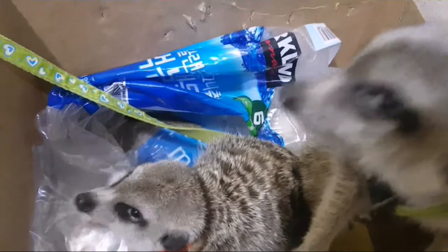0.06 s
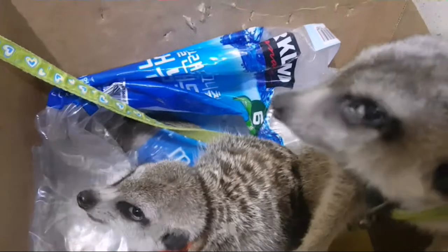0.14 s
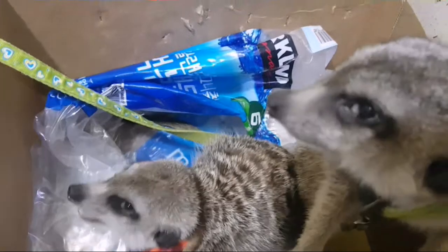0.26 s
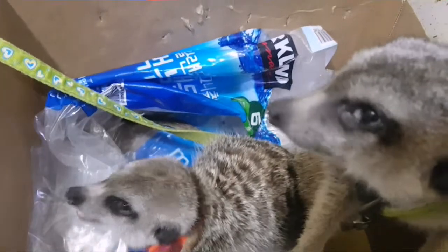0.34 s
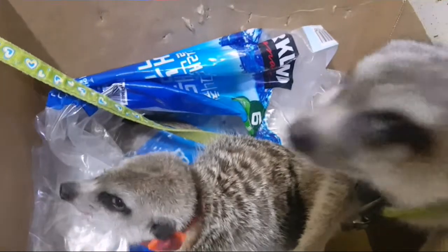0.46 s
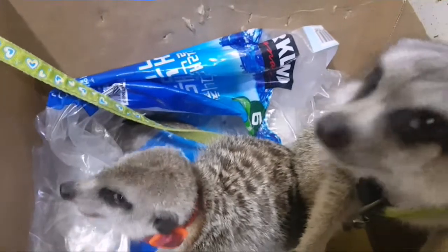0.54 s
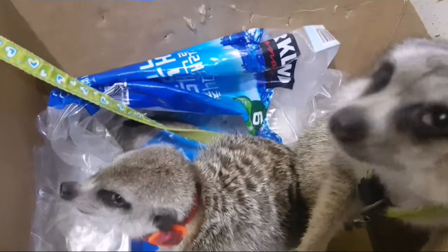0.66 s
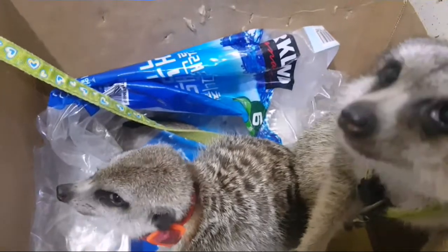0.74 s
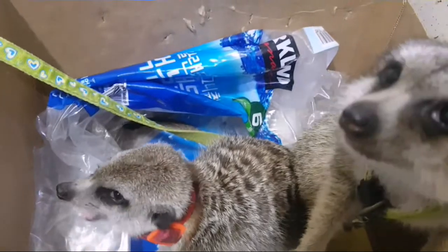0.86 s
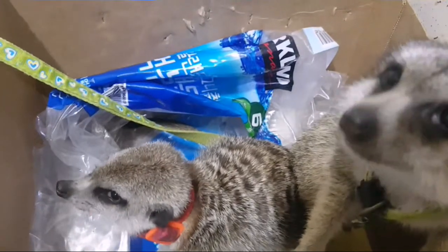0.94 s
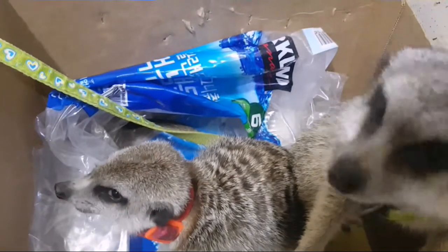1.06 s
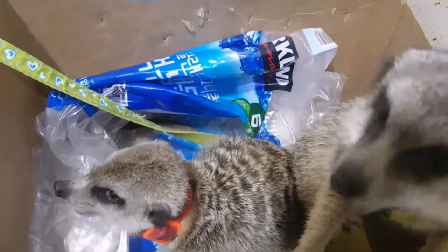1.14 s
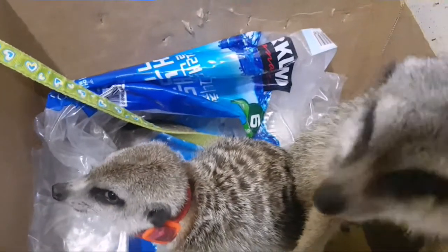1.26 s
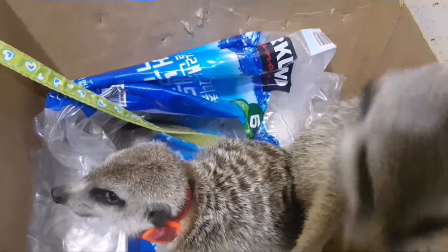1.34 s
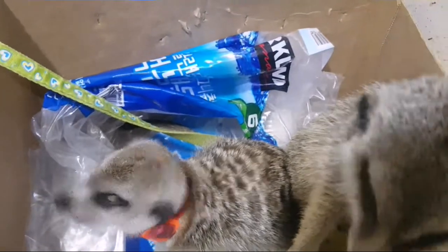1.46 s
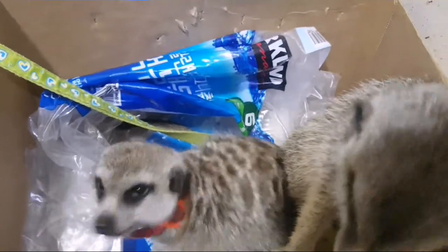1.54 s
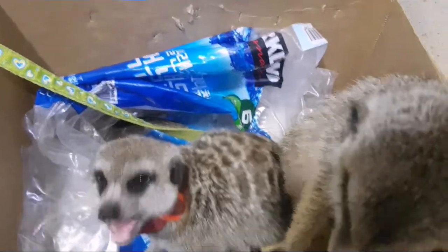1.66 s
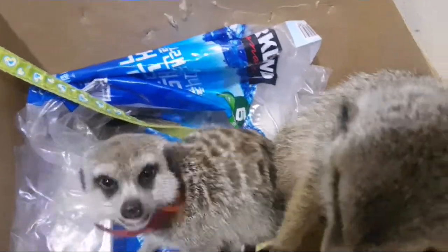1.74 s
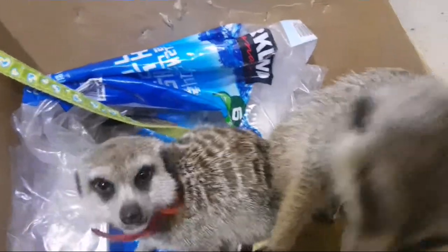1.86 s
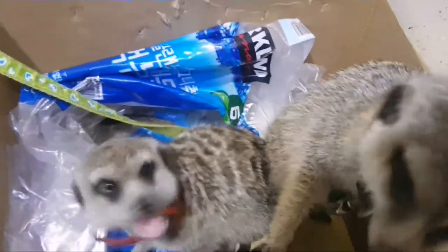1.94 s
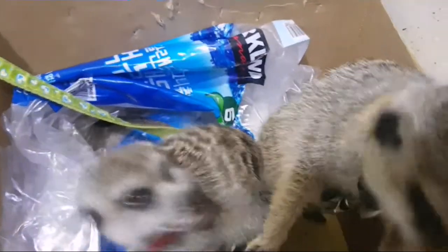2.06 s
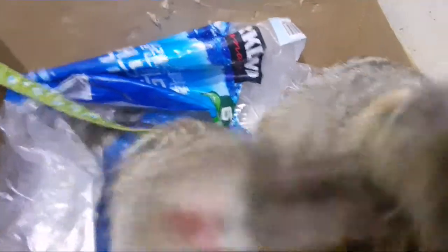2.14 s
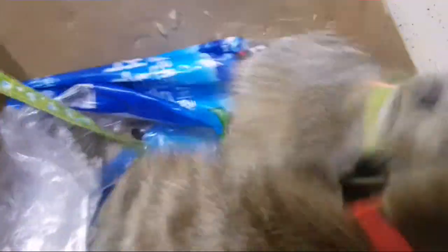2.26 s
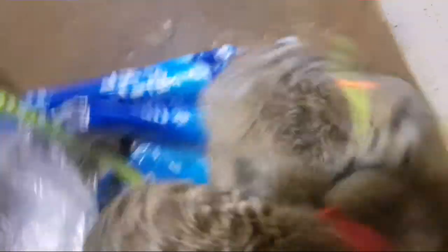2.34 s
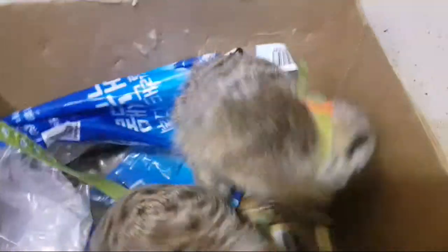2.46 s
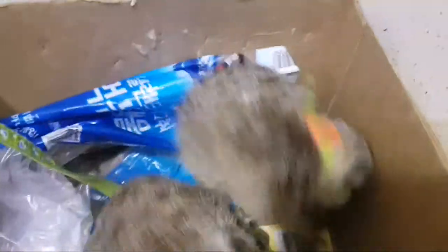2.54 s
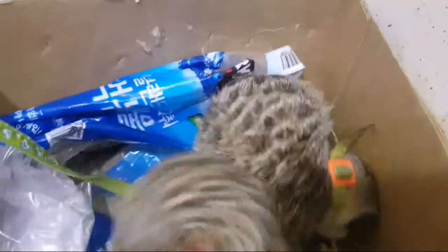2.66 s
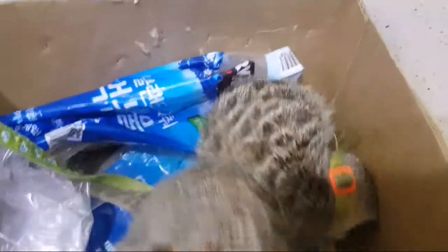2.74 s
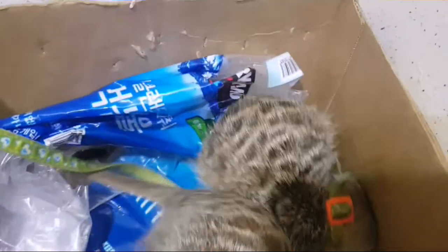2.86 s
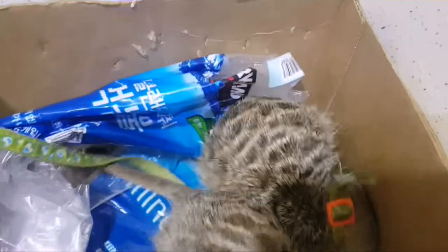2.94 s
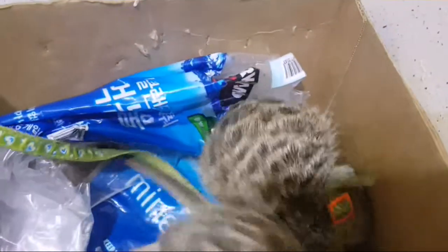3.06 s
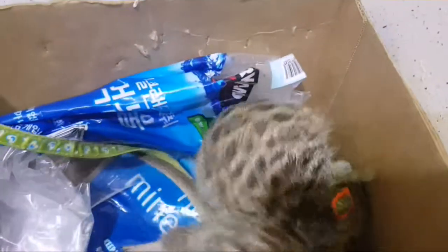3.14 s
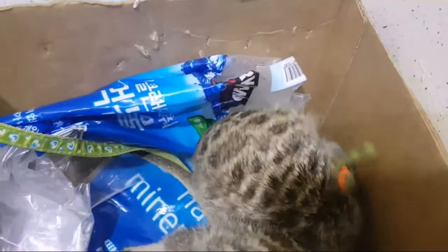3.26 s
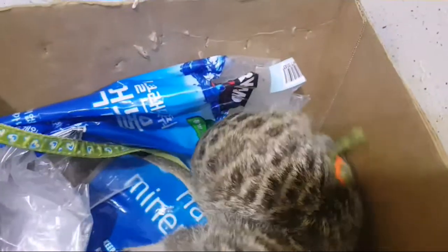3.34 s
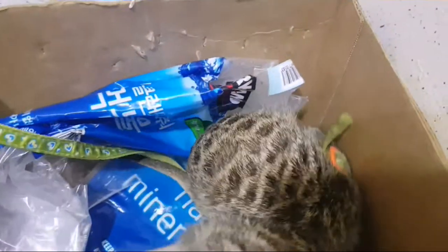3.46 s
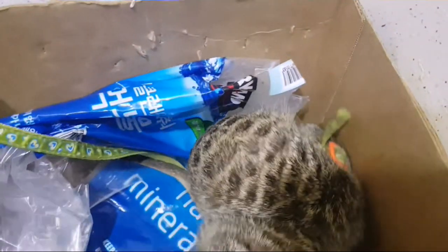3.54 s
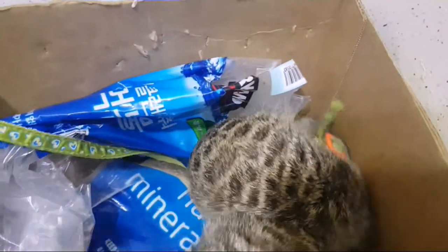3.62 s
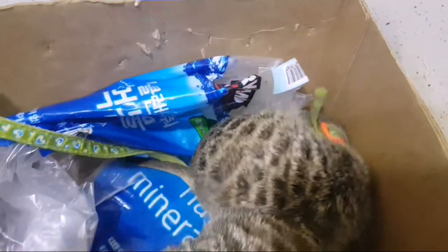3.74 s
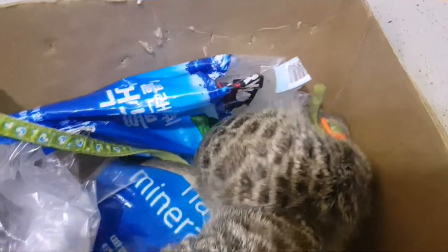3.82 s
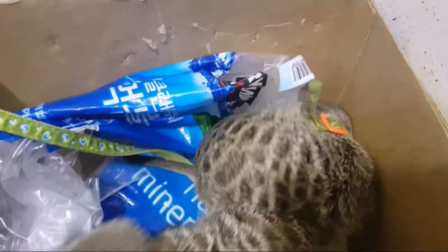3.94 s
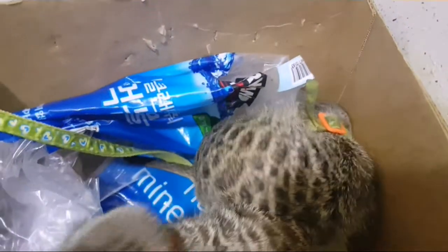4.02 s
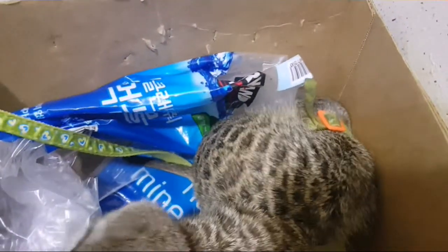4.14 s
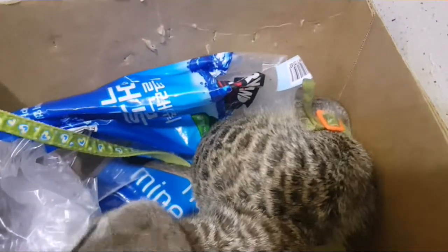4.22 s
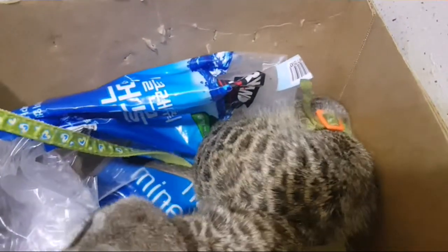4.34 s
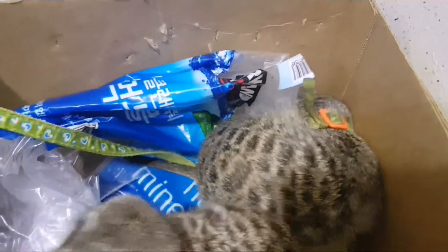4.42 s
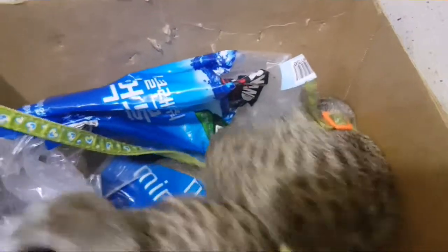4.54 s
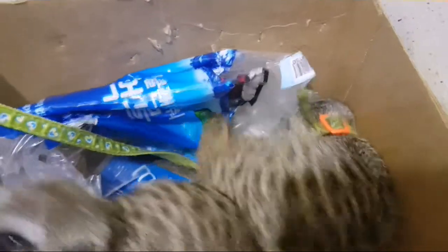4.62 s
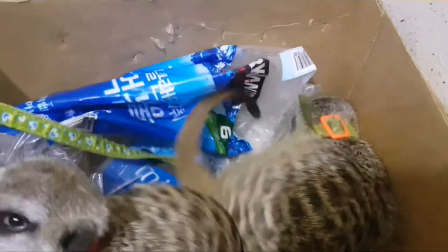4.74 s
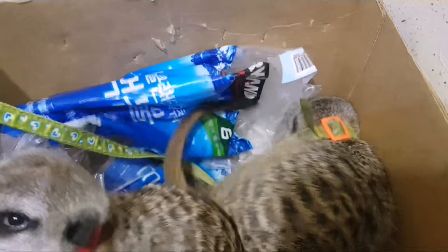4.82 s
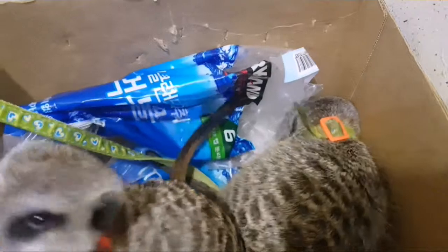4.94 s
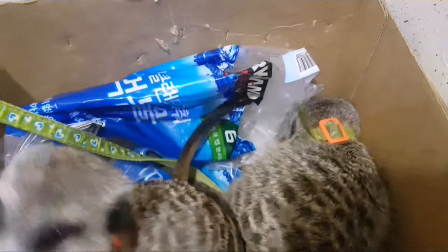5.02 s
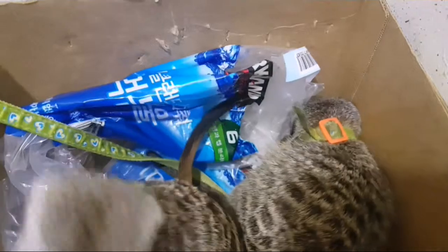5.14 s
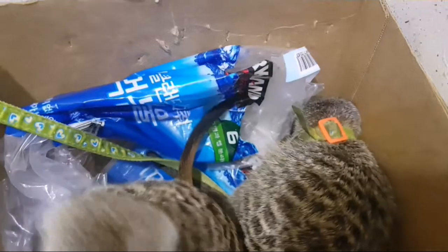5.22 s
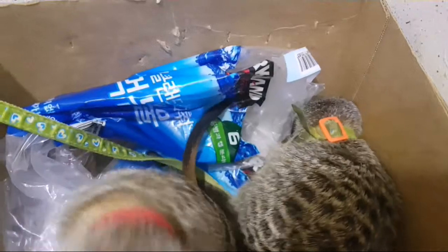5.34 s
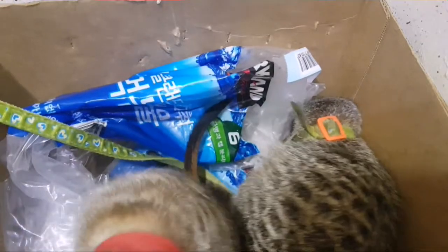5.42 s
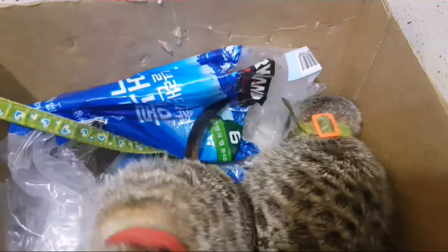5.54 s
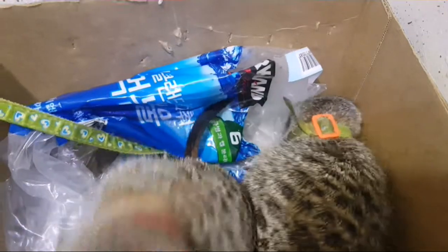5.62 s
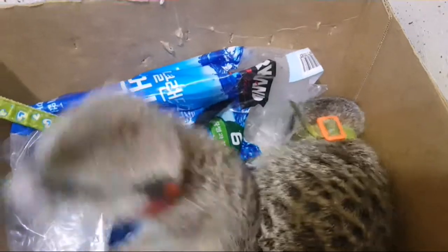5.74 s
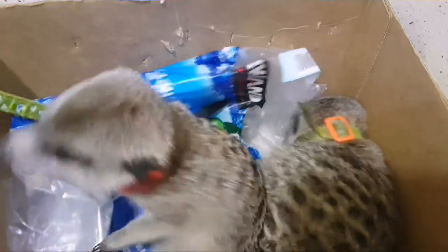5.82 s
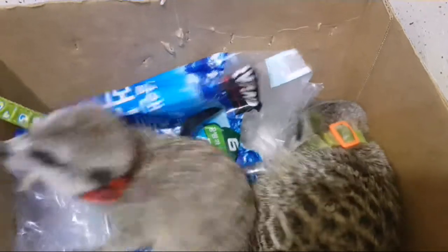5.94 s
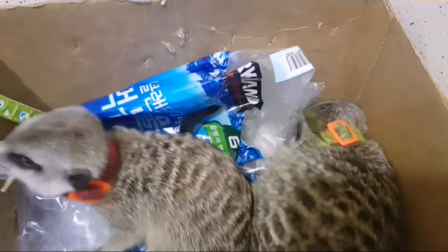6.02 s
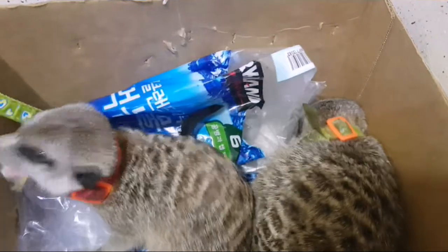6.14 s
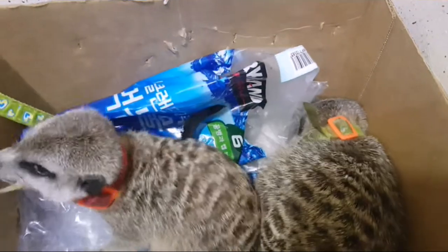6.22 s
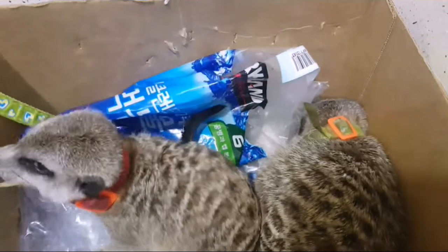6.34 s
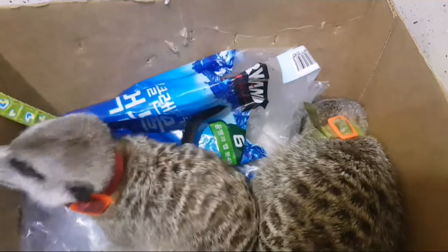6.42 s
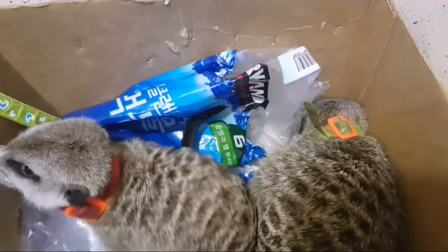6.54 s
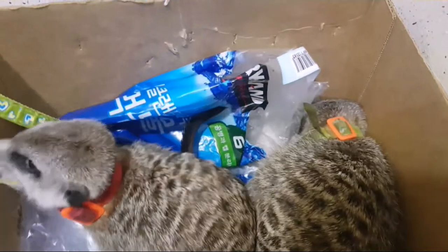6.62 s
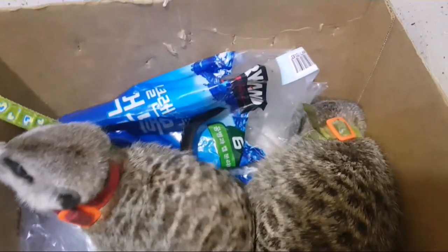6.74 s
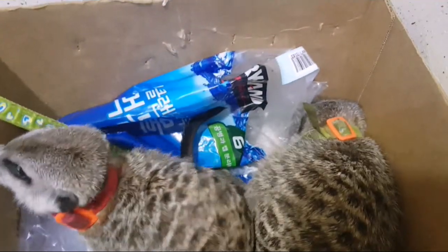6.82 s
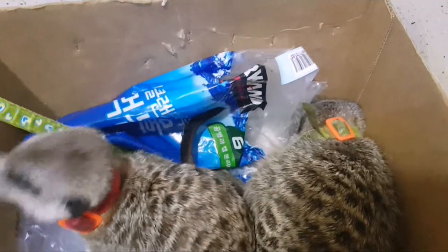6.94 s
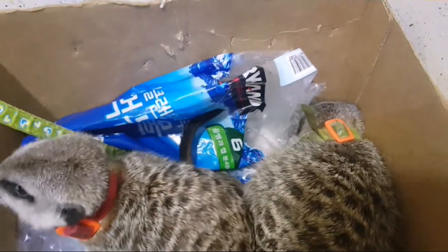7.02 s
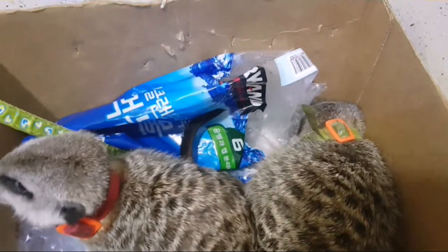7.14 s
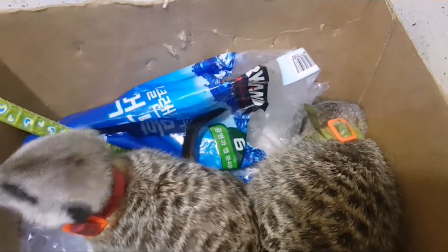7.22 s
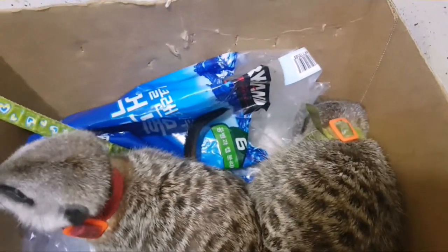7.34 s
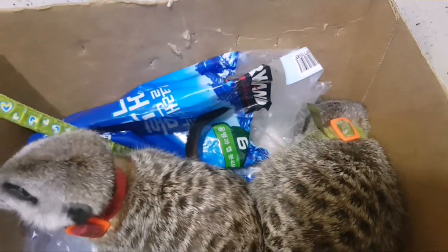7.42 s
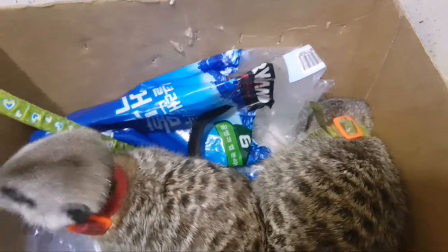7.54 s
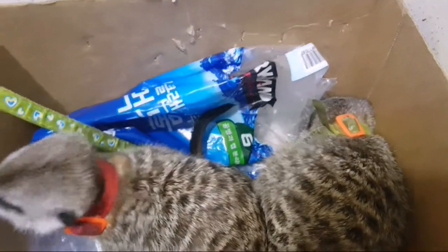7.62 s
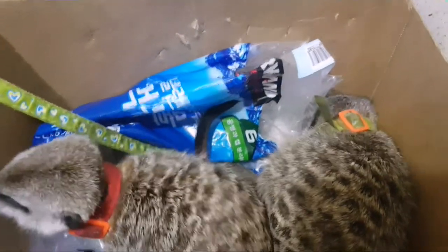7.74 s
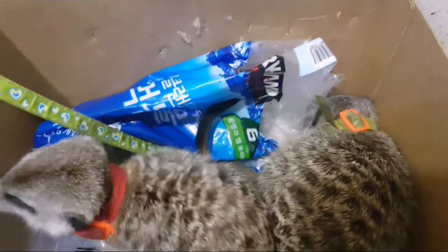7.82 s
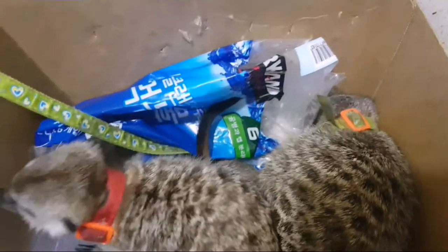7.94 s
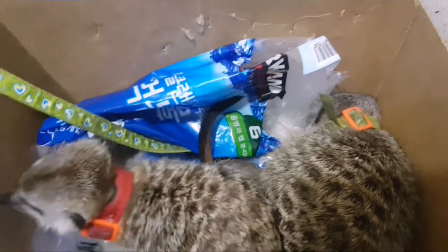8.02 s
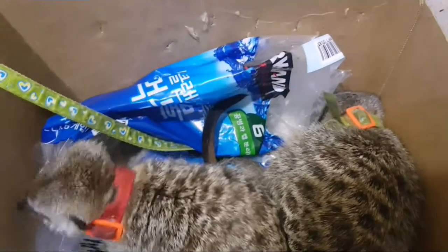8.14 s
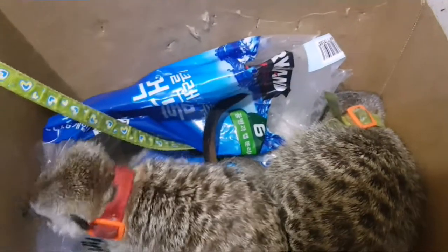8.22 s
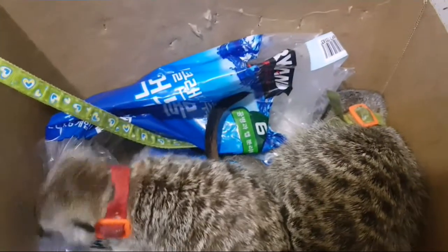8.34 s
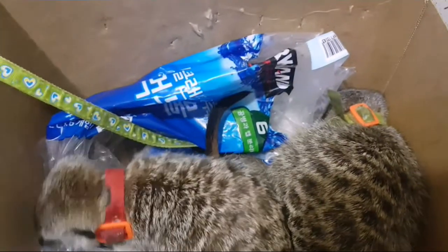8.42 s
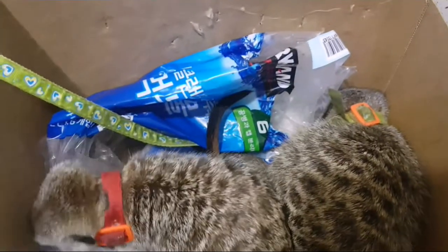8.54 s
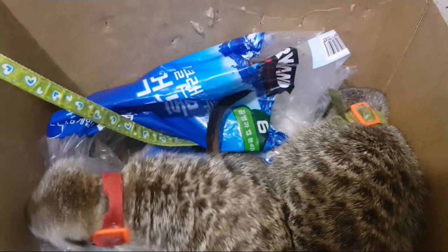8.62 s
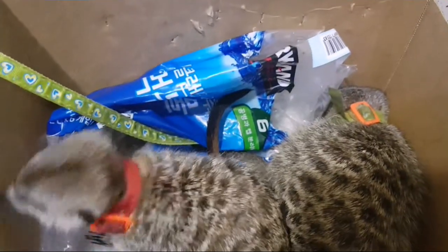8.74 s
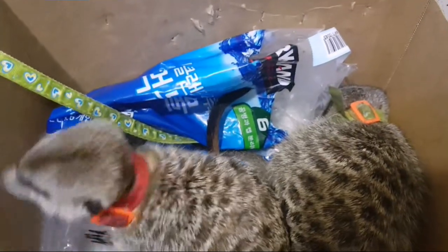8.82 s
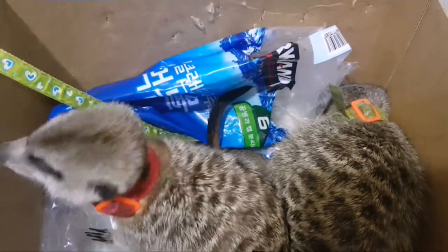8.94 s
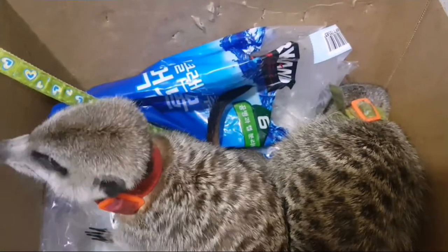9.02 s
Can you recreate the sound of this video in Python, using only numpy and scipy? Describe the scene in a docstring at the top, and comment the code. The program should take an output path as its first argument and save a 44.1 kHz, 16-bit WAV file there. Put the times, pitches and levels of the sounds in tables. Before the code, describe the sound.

Two meerkats are heard close up inside a cardboard box, in a quiet room with a slight echo and a faint hush. For the first two seconds they give short, soft, low growls, with a few plastic ticks at the start. From about 2.2 to 3 seconds comes the loudest part, a scuffle of raspy snarls, two squeaks, scraping claws, deep hollow thumps and crackling plastic wrapping. A longer growl follows at 3 seconds, then three snorts before 4 seconds, amid scattered snaps and brief murmurs. Another growl and rustling arrive around 4.6 to 5 seconds. Small rising squeaks run from 5.2 to 5.8 seconds with a couple of thumps, and paws scrape, knock and crinkle again around 6. From there the animals make clipped, buzzy nasal murmurs, some gliding upward, often paired. A crackling knock lands near 7.9 seconds and a soft thump near 8.8.

```python
"""In a bare room, two meerkats scuffle inside a cardboard box, close to the microphone.
They growl and snarl with puffs of air that ring the throat and nose, snort through the snout,
and murmur and squeak in short gliding tones. Their paws scrape the board, thump the walls and
crinkle plastic wrapping. The room echoes a little, and a faint high tone hangs over its hush."""
import sys
import numpy as np
from scipy import signal
from scipy.fft import rfft, irfft
from scipy.io import wavfile
from scipy.ndimage import uniform_filter1d

SR = 44100
rng = np.random.default_rng(int(sys.argv[2]) if len(sys.argv) > 2 else 0)


def inscribe(sig):
    """Save sig as 16-bit PCM at rate SR to the path in sys.argv[1].

    A 1-D sig is mono; a 2-D sig holds one channel per row.
    Samples are clipped to [-1, 1] before scaling.
    """
    pcm = np.round(np.clip(np.atleast_2d(sig).T, -1, 1) * 32767)
    wavfile.write(sys.argv[1], SR, pcm.astype(np.int16))


N = 400428

# The low notes at which the box walls ring: f/Hz, width/Hz, level/dB
WALL_MODES = [(66, 28, -4), (100, 40, -12), (129, 17, 2), (186, 30, -12)]
# The higher notes of the cardboard itself: f/Hz, width/Hz, level/dB
BOARD_MODES = [(291.6, 67, 1.5), (471, 96, 4), (625, 190, -1.5), (767, 113, -1), (903, 34, -5),
               (1150, 31, -3)]


def gain_of(db):
    """Turn decibels into a factor to multiply by."""
    return 10 ** (np.asarray(db) / 20)


def evened(x):
    """Scale a signal to an average strength (rms) of 1."""
    return x / np.sqrt(np.mean(x ** 2) + 1e-20)


def slow(noise, samples):
    """Smooth noise into a slow random wobble of strength 1."""
    return evened(uniform_filter1d(noise, samples))


def read(points, hz):
    """Look up a frequency in a table, sliding between its rows on a log scale."""
    f, value = np.transpose(points)
    return np.interp(np.log(hz + 1), np.log(f + 1), value)


def add(mix, s, sound):
    """Mix a sound in, starting at s seconds."""
    part = mix[round(s * SR):][:len(sound)]
    part += sound[:len(part)]


def swell(length, start_db, peak, end_db):
    """Give progress (0-1) and a level that passes 0 dB at peak, a share of the length."""
    u = np.arange(0, length, 1 / SR) / length
    return u, np.interp(u, [0, np.clip(peak, .01, .99), 1], [start_db, 0, end_db])


def above(x, hz):
    """Keep what lies above a frequency."""
    return signal.sosfilt(signal.butter(3, hz, "high", fs=SR, output="sos"), x)


def colour(x, points):
    """Make each frequency louder or softer as a table says."""
    hz = np.fft.rfftfreq(x.shape[-1], 1 / SR)
    return irfft(rfft(x) * gain_of(read(points, hz)), x.shape[-1])


def resonate(x, hz, width):
    """Ring at a pitch that may move: shift it down to zero, smooth, and shift back."""
    turn = np.exp(2j * np.pi * np.cumsum(hz * np.ones(len(x))) / SR)
    decay = np.exp(-np.pi * width / SR)
    return 2 * (turn * signal.lfilter([1 - decay], [1, -decay], x / turn)).real


def cavity(x, hz, width):
    """A hollow, such as the throat, picks out one band: two resonances in a row, at strength 1."""
    return evened(resonate(resonate(x, hz, width), hz, width))


def body(x, modes):
    """An object rings at all its own notes when pushed."""
    return sum(gain_of(db) * resonate(x, hz, width) for hz, width, db in modes)


def grains(per_s, spread_db, hiss):
    """Scattered clicks of uneven size, with optional hiss."""
    size = gain_of(spread_db * np.minimum(rng.exponential(1, N), 5)) * (rng.random(N) < per_s / SR)
    return evened(size * rng.choice([-1., 1.], N)) + hiss * rng.standard_normal(N)


def hush(tone_hz=13819, tone_db=-84):
    """Room air that gently swells, and one thin steady tone."""
    # The colour of the air's noise: f/Hz, level/dB
    spectrum = [(15, -41), (25, -16), (92, -1), (123, 3), (175, -10.5), (463, -6.5), (659, -17), (818, -17),
                (1700, -23), (2160, -22.5), (8830, -34), (14000, -27.5), (16000, -63.5)]
    air = evened(colour(rng.standard_normal((2, N)), spectrum))
    air_db = -59 + .5 * slow(rng.standard_normal(N), 9000)
    tone = np.sqrt(2) * gain_of(tone_db) * np.sin(2 * np.pi * tone_hz * np.arange(N) / SR)
    return gain_of(air_db) * air + tone


def room_tails(fill_s=.014):
    """The room answers a click with two trains of random echoes; each band dies at its own speed."""
    # How long the room rings: f/Hz, time to fade by 60 dB/s
    ring_times = [(100, 0.58), (300, 0.82), (700, 1), (1200, 0.67), (1700, 0.52), (2600, 0.55),
                  (5000, 0.25), (14000, 0.19)]
    taps = np.zeros((2, SR))
    at = np.arange(500, SR - 20, 20)
    at = at + rng.integers(0, 20, (2, len(at)))
    np.put_along_axis(taps, at, rng.choice([-1., 1.], at.shape), 1)
    taps *= np.minimum(np.arange(SR) / SR / fill_s, 1)
    hz, t, bands = signal.stft(taps, SR, nperseg=512)
    tail = signal.istft(bands * gain_of(-60 * t / read(ring_times, hz)[:, None]), SR, nperseg=512)[1]
    return tail / np.linalg.norm(tail, axis=1, keepdims=True)


def room_echo(x, blend_hz=13):
    """The animals keep moving, so the echo keeps shifting between two patterns."""
    turn = 2 * np.pi * blend_hz * np.arange(N) / SR
    return sum(signal.fftconvolve((x * share)[None], room_tails(), axes=1)[:, :N]
               for share in (np.sin(turn), np.cos(turn)))


def box_echo(x):
    """The direct sound is followed by faint bright bounces off the box walls."""
    bounces = .17 * rng.standard_normal((2, 600)) * np.exp(-np.arange(600) / 200)
    bounces = above(bounces * (rng.random((2, 600)) < .1), 1280)
    bounces[[0, 1], [0, 10]] = 1  # the direct sound reaches the right side 10 samples later
    return signal.oaconvolve(x[None], bounces, axes=1)[:, :N]


def microphone_ports(scattered, direct):
    """The microphone's two openings hear scattered bass alike and scattered treble apart."""
    # How alike the two sides are: f/Hz, likeness/0-1
    likeness = [(60, .99), (290, .985), (640, .72), (1400, .1), (15000, 0)]
    # How much louder the left side is: f/Hz, left over right/dB
    balance = [(60, -.7), (180, -2), (550, -3.2), (1650, -1.5), (4970, -1), (15000, 1.5)]
    hz = np.fft.rfftfreq(N, 1 / SR)
    same, lean = read(likeness, hz), gain_of(read(balance, hz) / 2)
    left, other = rfft(scattered)
    right = same * left + np.sqrt(1 - same ** 2) * other
    heard = np.array([left, right]) + rfft(direct)
    return irfft(heard * [lean, 1 / lean], N)


def rummaging(fizz_db=-9, peak=.54, ends_db=-21):
    """How strong rumble, scrape, crackle and fizz are over time: steady stirring plus sudden shifts."""
    # Steady stirring: t/s, weight on the box/dB, claws/dB, plastic/dB
    stirring = [(2.18, -50, -70, -77), (2.3, -44, -32.5, -60), (2.44, -27.5, -23, -46),
                (2.62, -31, -32, -44), (2.92, -46.5, -32.5, -59), (3.07, -56, -43.5, -48.5),
                (3.43, -45, -43.5, -95), (3.56, -52, -51, -71), (3.9, -63, -49, -48), (4.1, -63, -53, -65),
                (4.54, -60, -52.5, -70), (4.62, -53.5, -39, -66), (5.05, -46.5, -63, -46.5),
                (5.2, -60.5, -51, -69), (5.45, -51, -56, -110), (5.8, -47.5, -37, -51),
                (5.92, -58, -50, -55), (6.2, -44, -49.5, -52), (6.4, -53.5, -54.5, -55.5),
                (7.0, -72, -60.5, -65), (7.7, -64, -70, -70), (7.95, -45, -56.5, -50),
                (8.3, -59, -60.5, -71), (8.7, -76, -99.5, -96), (9.08, -51.5, -84, -79.5)]
    # Sudden shifts of a paw: peak t/s, length/s, weight/dB, claws/dB, crackle/dB, fizz/dB
    shifts = [(2.275, 0.12, -60, -41, -39, -42), (2.35, 0.083, -18, -21.5, -65, -65),
              (2.4, 0.083, -37.5, -29, -38, -47), (2.508, 0.096, -27, -24, -25.5, -25.5),
              (2.626, 0.13, -36, -31.5, -33, -35.5), (2.753, 0.12, -45, -38, -33, -44.5),
              (2.964, 0.061, -27.5, -34.5, -45, -40.5), (3.268, 0.077, -60, -35.5, -63, -54),
              (3.789, 0.13, -60, -58, -41, -41), (4.726, 0.15, -43, -51, -37, -44.5),
              (4.866, 0.17, -60, -35.5, -37, -42), (5.041, 0.087, -44, -37.5, -48, -56),
              (5.513, 0.086, -33, -66, -73, -66), (6.005, 0.26, -36, -38.5, -44.5, -49.5),
              (6.042, 0.16, -26, -40.5, -39.5, -43), (6.129, 0.12, -35, -28.5, -33.5, -39.5),
              (6.875, 0.13, -70, -50, -60, -56), (7.097, 0.035, -57.5, -46.5, -69, -54),
              (7.38, 0.19, -56, -70, -55.5, -58), (7.712, 0.12, -66, -63, -60, -56),
              (7.794, 0.27, -54, -53, -61, -57), (7.892, 0.093, -37, -34.5, -34, -36),
              (8.278, 0.11, -66, -57, -58, -61), (8.862, 0.21, -42, -79.5, -64.5, -55.5)]
    times, *columns = np.transpose(stirring)
    t = np.arange(times[0], times[-1], 1 / SR)
    weight_db, claws_db, film_db = [np.interp(t, times, column) for column in columns]
    power = np.zeros((4, N))
    for layer, db in zip(power, (weight_db, claws_db, film_db, film_db + fizz_db)):
        add(layer, times[0], gain_of(2 * db))
    for s, length, *levels_db in shifts:
        shape_db = swell(length, ends_db, peak, ends_db)[1]
        for layer, db in zip(power, levels_db):
            add(layer, s - peak * length, gain_of(2 * (db + shape_db)))
    return np.sqrt(power)


def paws():
    """Shifting weight rumbles the box, claws scrape the board and the plastic crackles."""
    # The colour of the plastic's crackle: f/Hz, level/dB
    crackle_colour = [(700, -25), (1200, 4), (1800, 3), (2700, 5), (4000, -2), (6000, -17), (9000, -104)]
    # The colour of its high fizz: f/Hz, level/dB
    fizz_colour = [(3000, -30), (5000, -6), (7500, -5), (9500, 0), (12500, -3), (14500, -8), (16000, -22)]
    gains = rummaging()
    clumps = gain_of(.68 * slow(rng.standard_normal(N), 500))  # creases give way in bunches
    creases = grains(per_s=320, spread_db=2.6, hiss=0)
    rattle = evened(signal.lfilter([1], [1, -.988], abs(creases)))  # each rattles for 2 ms
    pair = np.zeros((2, N))
    for side in pair:  # each side is nearer to other spots, so it gets its own noise
        weight = resonate(grains(per_s=300, spread_db=3, hiss=.9), 110, 150)
        scrape = above(body(grains(per_s=700, spread_db=1.5, hiss=.93), BOARD_MODES), 143)
        film = clumps * (.6 + rattle) * rng.standard_normal(N)
        layers = body(weight, WALL_MODES), scrape, colour(film, crackle_colour), colour(film, fizz_colour)
        side += sum(gain * evened(x) for x, gain in zip(layers, gains))
    return pair


def plastic_snaps():
    """Each crease pops as a short burst of noise, partly ringing at its own pitch."""
    # Popping creases: t/s, level/dB, f/Hz, treble/dB, left over right/dB (held within 10)
    creases = [(0.084, -38, 1490, -46, 0), (0.099, -52, 2850, -59, 3), (0.126, -40.5, 2100, -51, 1),
               (2.219, -43.5, 2220, -53, -0.5), (2.2518, -42, 3280, -34, 2), (2.291, -24, 1720, -41.5, 0),
               (2.3321, -44, 2250, -46.5, -3.0), (2.375, -19, 1800, -38, -13), (2.463, -27, 2880, -40, -11),
               (2.489, -25, 2450, -20, -13), (2.515, -30, 1500, -10, -2), (2.537, -35, 5200, -40, 0),
               (2.772, -22, 1470, -53, 1), (2.864, -35, 2970, -23, 2), (2.9447, -22, 2330, -13, -12),
               (2.972, -31, 2500, -28, 4), (3.033, -35.5, 2680, -54, 1), (3.097, -47, 3500, -42, 2),
               (3.137, -39, 2620, -38, 1), (3.2555, -30, 1600, -42, 3), (3.306, -49, 3800, -42, 3),
               (3.535, -36.5, 1600, -62.5, 0), (3.755, -36.5, 2780, -44, 3), (4.026, -53, 2980, -58, 0),
               (4.0818, -33, 1840, -61, 0), (4.1117, -40.5, 1620, -71, -12), (4.156, -43.5, 2140, -58, 1),
               (4.2219, -25, 2580, -10, 0.5), (4.234, -51, 4000, -46, 0), (4.3292, -33, 2220, -55.5, -1),
               (4.4098, -27.5, 2660, -26, 2), (4.488, -48, 2010, -60, 4), (4.5808, -32, 1750, -48, 0),
               (4.77, -24, 900, -60, -1), (4.897, -35, 1100, -60, -6), (4.623, -53, 3000, -55, 0),
               (4.656, -40, 1190, -60, -2), (4.689, -26.5, 1820, -20, 4), (4.7125, -39, 2500, -48, -13),
               (4.729, -31, 2880, -44, 1), (4.828, -39, 3200, -55, 2), (4.838, -29.5, 2370, -53, -13),
               (4.8616, -46, 3360, -59, -17), (4.9165, -61, 2750, -52, -4), (4.967, -39, 3200, -45, 3),
               (5.0014, -25, 1780, -16.5, 0.5), (5.016, -43, 3750, -50, 1), (5.0486, -33, 4500, -25, 3),
               (5.656, -46.5, 3330, -54, 1), (5.7942, -20.5, 1550, -32, 0), (5.978, -39, 2470, -26, 11),
               (6.001, -39, 2580, -46, 7), (6.038, -30, 2960, -47.5, 6), (6.1092, -24.5, 2370, -49, 12),
               (6.122, -24.5, 3700, -45, -10), (6.132, -24.5, 2460, -45.5, 7), (6.353, -34.5, 2650, -47, 1),
               (6.69, -36, 2830, -69, 1), (6.746, -53, 2860, -67, -2), (6.811, -54, 3300, -65, 2),
               (7.075, -50, 3420, -48, 3), (7.111, -53, 1990, -70, 3), (7.243, -51, 2480, -70, 0),
               (7.342, -46, 3280, -62, -2), (7.46, -52, 2000, -75, 2), (7.8757, -26.5, 3300, -34, -4),
               (7.892, -26.5, 4240, -37, -8)]
    mix, t = np.zeros((2, N)), np.arange(700) / SR
    for s, db, hz, treble_db, pan_db in creases:
        let_go_s = np.interp(db, [-42, -30], [.004, .0012])  # faint creases let go more slowly
        bursts = rng.standard_normal((2, len(t))) * (np.exp(-t / let_go_s) + .2 * np.exp(-t / .006))
        for side, burst, sign in zip(mix, bursts, (1, -1)):
            ring = gain_of(db + 10.5) * resonate(burst, hz, hz / 2)
            treble = gain_of(treble_db - 7) * resonate(above(burst, 6500), 5500, 5600)
            add(side, s, gain_of(sign * np.clip(pan_db, -10, 10) / 2) * (ring + treble))
    return mix


def box_knocks():
    """A soft blow rings the walls low; its sharper edge is heard as a push and rings the board."""
    # Knocks on the box: t/s, soft blow/dB, sharp edge/dB
    hits = [(2.345, -4.5, -25), (2.415, 3, -18.5), (2.45, 4.5, -47), (2.487, -28, -47), (2.611, -18, -49),
            (2.948, -8, -33.5), (3.02, -9, -38.5), (4.701, -19, -46), (4.84, -44, -36), (4.962, -23, -66),
            (5.468, -9.5, -43), (5.531, -6, -46), (5.956, -13, -50), (6.022, -30, -43), (6.13, -7, -37.5),
            (7.788, -19, -53), (7.871, -32, -47), (7.894, -18, -41), (8.811, -14.5, -59)]
    blows, edges = np.zeros(N), np.zeros(N)
    for s, blow_db, edge_db in hits:
        add(blows, s, gain_of(blow_db) * np.hanning(300))
        add(edges, s, gain_of(edge_db) * np.hanning(50))
    ring = gain_of(-9.5) * body(blows, WALL_MODES) + gain_of(21.5) * body(edges, BOARD_MODES)
    return ring - gain_of(12) * above(edges, 127)


def breathy_and_muffled(voice, hiss_db=-26):
    """Breath hiss rides on the voice; fur and box swallow the voice's treble."""
    hiss = uniform_filter1d(abs(voice), 80) * resonate(above(rng.standard_normal(N), 3000), 14000, 4700)
    return gain_of(hiss_db) * hiss + signal.sosfilt(signal.butter(3, 4700, fs=SR, output="sos"), voice)


def snort(length, db, peak):
    """Air flutters through the snout."""
    # Where the snout rings: f/Hz, width/Hz, level/dB
    snout = [(1233, 300, 2), (1830, 430, 3), (2710, 800, 3), (3760, 600, -16)]
    from_peak = swell(length, 1, peak, 1)[1]  # 1 at both ends, 0 at the peak
    air, flutter = rng.standard_normal((len(from_peak), 2)).T
    air = air * gain_of(3 * slow(flutter, 120))
    blown = sum(gain_of(band_db) * cavity(air, hz, width) for hz, width, band_db in snout)
    return gain_of(db - 45 * from_peak ** 3.5) * evened(blown)


def voiced_tone(hz, level_db, over_db, rough):
    """A tone with overtones shaped by the mouth; roughness shakes the pitch and smears the sound."""
    # How the mouth shapes the overtones: f/Hz, level/dB
    mouth = [(500, 9.5), (850, -3), (1150, 1.5), (1700, -11), (2300, -4.5), (3000, -35.5), (4500, -84)]
    wobble, breath = rng.standard_normal((len(hz), 2)).T
    turns = np.cumsum(hz * (1 + .16 * rough * slow(wobble, 150))) / SR
    smear = 1 - rough + rough * slow(breath, 60)
    base = (1 - rough ** 2 + rough ** 2 * smear) * np.sin(2 * np.pi * turns)
    overtones = sum(gain_of(read(mouth, k * hz)) * np.sin(2 * np.pi * k * turns) for k in range(2, 13))
    voice = base + gain_of(over_db) * smear * overtones
    return np.sqrt(2) * gain_of(level_db) * voice * signal.windows.tukey(len(hz), .3)


def squeaks(start_rough=.65):
    """Rising whines that start hoarse, swell late and mostly clear as they go."""
    # Whines: t/s, length/s, level/dB, from f/Hz, to f/Hz, overtones/dB, start level/dB,
    # final roughness/0-1, bend (small = early rise)
    whines = [(2.25, 0.075, -26.5, 847, 945, -6, -6, 0.67, 0.62),
              (2.345, 0.075, -16, 705.4, 796.5, -1.5, -4, 0.45, 1.12),
              (4.368, 0.038, -41.5, 481, 602, 2.5, 2, 0.32, 0.65),
              (5.234, 0.073, -30.5, 483, 607, -2, -10, 0.11, 0.41),
              (5.398, 0.059, -26, 515, 721, -5.5, -13, 0.25, 0.71),
              (5.555, 0.058, -27, 591, 695, -8, -5.5, 0.07, 1.2),
              (5.634, 0.063, -37.5, 496.5, 555, -2, 4, 0, 1),
              (5.69, 0.043, -40, 539, 580, 0.5, -2, 0.04, 1.2), (5.74, 0.023, -39, 450, 467, 0, 2, 0, .9),
              (5.768, 0.038, -32, 483.4, 549, 6, -4.5, 0.42, .9)]
    mix = np.zeros(N)
    for s, length, db, from_hz, to_hz, over_db, start_db, end_rough, bend in whines:
        u, shape_db = swell(length, start_db, peak=.65, end_db=-8)
        hz = from_hz + (to_hz - from_hz) * u ** bend
        rough = np.clip(end_rough + (start_rough - end_rough) * (1 - u) ** 2, 0, 1)
        add(mix, s, voiced_tone(hz, db + shape_db, over_db, rough))
    return breathy_and_muffled(mix)


def glide(t, from_hz, to_hz, glide_s=.016):
    """A pitch slides quickly at first, then settles on its goal."""
    return to_hz + (from_hz - to_hz) * np.exp(-t / glide_s)


def murmur(length, db, from_hz, to_hz, sag_hz_per_s=250, throb_hz=54):
    """The pitch glides and sags; the further it climbs, the more it throbs over a lingering chest tone."""
    t = np.arange(0, length, 1 / SR)
    strain = np.clip((to_hz / from_hz - 1) / .4, 0, 1)  # a 40% rise strains the voice fully
    hz = glide(t, from_hz, to_hz) - sag_hz_per_s * t
    level_db = db + swell(length, start_db=2.5, peak=.59, end_db=-4.5)[1]
    rough = .12 + .23 * strain
    voice = voiced_tone(hz, level_db, over_db=-26.5 + 8.5 * strain, rough=rough)
    chest = voiced_tone(np.full(len(t), from_hz), level_db - 4 - 14 * t / length, over_db=-10, rough=rough)
    return (voice + strain * chest) * (1 + .45 * strain * np.cos(2 * np.pi * throb_hz * t))


def nose_buzz(length, db, from_hz, to_hz):
    """Pulses and puffs from the vocal folds ring the mouth and nose; the nose tightens as pitch climbs."""
    t = np.arange(round(max(length, .01) * SR)) / SR
    hz = glide(t, from_hz, to_hz)
    cycle = np.cumsum(hz) / SR % 1
    air = rng.standard_normal(len(t)) * (.4 + np.exp(-cycle / .2))
    puffs = evened(np.exp(-cycle / .03)) + evened(air)
    ring = (cavity(puffs, 3560 * (hz / to_hz) ** .15, 1140) - gain_of(-2.5) * cavity(puffs, 2720, 400)
            + gain_of(-10.5) * cavity(puffs, 2250, 400) - gain_of(-8) * cavity(puffs, 1060, 300))
    return gain_of(db - 11) * ring * signal.windows.tukey(len(t), .4)


def snarl(length, db, from_hz, to_hz, nose_from_hz, nose_to_hz, nose_db, pulses_per_s=140):
    """Fast ragged puffs pass a tight throat while steady air squeals in the wavering nose."""
    u, shape_db = swell(length, start_db=-4.5, peak=.22, end_db=-4.5)
    noise, wobble, drift = rng.standard_normal((len(u), 3)).T
    turns = np.cumsum(pulses_per_s * (1 + .3 * slow(wobble, 300))) / SR
    puffs = noise * (.3 + np.exp(-(turns % 1) / .3))
    waver = 1 + .02 * slow(drift, 500)
    throat = cavity(puffs, (from_hz + (to_hz - from_hz) * u) * waver, 370)
    nose_hz = nose_from_hz + (nose_to_hz - nose_from_hz) * np.sin(np.pi / 2 * u)
    nose = gain_of(nose_db) * cavity(noise, nose_hz * waver, 120)
    return gain_of(db + shape_db) * (throat + nose) * signal.windows.tukey(len(u), .2)


def growl(length, db, peak, from_hz, to_hz, mouth_db, nose_db, lips_from_hz, lips_mid_hz, pulses_per_s=72):
    """Slow uneven pulses, each a puff of noise, ring the throat, mouth and nose."""
    u, shape_db = swell(length, -2.5, peak, -6.5)
    noise, wobble, size, drift = rng.standard_normal((len(u), 4)).T
    turns = np.cumsum(pulses_per_s * (1 + .28 * slow(wobble, 500))) / SR
    slaps = 36 * uniform_filter1d(np.diff(np.floor(turns), prepend=0), 24)  # vocal folds close softly
    puffs = noise * (.27 + np.sin(np.pi * (turns % 1) ** .5) ** 4)
    drive = gain_of(2 * size[turns.astype(int)]) * (slaps + puffs)
    wander = 1 + .045 * slow(uniform_filter1d(drift, 900), 300)  # all the hollows drift together
    ring = lambda hz, width: cavity(drive, hz * wander, width)
    throat = above(ring(from_hz + (to_hz - from_hz) * u, 182), 148)
    mouth = ring(940, 434) - gain_of(-6) * ring(595, 200)
    lips = ring(np.interp(u, [0, .52, .85], [lips_from_hz, lips_mid_hz, 2970]), 420)
    palate = ring(2150, 740)
    nose = ring(2560, 400) - gain_of(-4) * (lips + palate)
    open_db = -19 * np.exp(-u * length / .0065) - 2.5 * u  # the mouth opens fast, then closes a little
    voice = throat + gain_of(mouth_db + open_db) * mouth + gain_of(nose_db + open_db) * nose
    return gain_of(db + shape_db) * voice * signal.windows.tukey(len(u), .06)


def meerkats():
    """The animals growl, murmur with a buzz in the nose, snarl and snort."""
    # Growls: t/s, length/s, level/dB, peak/share of length, throat from f/Hz, to f/Hz,
    # mouth over throat/dB, nose over throat/dB, lips from f/Hz, lips midway f/Hz
    growls = [(0.0, 0.022, -29.5, 0.022, 236, 250, -11.5, -18, 3070, 3300),
              (0.17, 0.026, -40.5, 0.27, 294, 318, 5, -2, 3340, 3300),
              (0.387, 0.042, -34.5, 0.22, 327, 308, -9, -11, 3300, 3200),
              (0.202, 0.19, -35.5, 0.37, 347, 317, -2.5, -15, 3450, 3360),
              (0.246, .06, -36.5, 0.71, 426, 400, 1, -11, 3500, 3330),
              (0.727, 0.18, -36, 0.35, 306, 370, -6.5, -16, 3840, 3580),
              (1.29, 0.13, -39, 0.49, 289, 442, -5.5, -17, 3770, 3460),
              (1.843, 0.35, -42.5, 0.74, 290, 268, 3, -4.5, 3700, 2040),
              (2.034, .155, -38, 0.76, 290, 272, -12, -39.5, 3100, 3100),
              (3.058, 0.33, -30.5, 0.7, 274, 227, -19, -43, 3200, 3180),
              (3.361, 0.057, -39.5, 0.58, 302, 282, 4, -17, 3200, 3200),
              (4.583, .15, -38.5, 0.89, 325, 383, -3.5, -11, 3200, 2980),
              (5.082, 0.063, -33, 0.21, 290, 256, -7, -30, 3200, 3200)]
    # Murmurs: t/s, length/s, level/dB, from f/Hz, goal f/Hz, nose buzz/dB
    murmurs = [(2.111, 0.089, -38.5, 287, 295, -55), (3.659, 0.046, -34, 261, 365.5, -69),
               (4.01, 0.044, -35.5, 303.6, 454, -42.5), (4.421, 0.012, -36, 318, 332, -79),
               (5.024, 0.052, -30, 233.4, 288, -60), (5.537, 0.014, -30, 285, 238, -59),
               (6.087, 0.038, -33.5, 229.4, 243, -60), (6.175, 0.04, -32.5, 297, 262, -56),
               (6.353, 0.05, -34.5, 259, 449, -38.5), (6.565, 0.053, -35.5, 244.7, 439, -32.5),
               (6.821, 0.0086, -43.5, 239, 237, -36), (6.833, 0.033, -35.5, 261.6, 442.5, -35.5),
               (7.084, 0.05, -37, 268, 437.4, -49), (7.141, 0.009, -37.5, 244, 234, -66),
               (7.318, 0.047, -38, 268.5, 441, -39), (7.359, 0.029, -34, 233.7, 229, -39.5),
               (7.662, 0.045, -42, 276, 455.5, -35.5), (7.701, 0.037, -34, 266.7, 263, -34.5),
               (7.887, 0.031, -32, 286, 276, -60), (7.993, 0.024, -33, 261, 256, -34.5),
               (8.25, 0.028, -33, 290, 297, -37.5), (8.293, 0.023, -41, 263, 225, -59),
               (8.754, 0.024, -32, 272, 284, -46.5), (8.788, 0.026, -37, 254, 216.5, -46.5)]
    # Snarls: t/s, length/s, level/dB, throat from f/Hz, to f/Hz, nose from f/Hz, to f/Hz,
    # nose over throat/dB
    snarls = [(2.25, 0.063, -35, 900, 880, 3240, 3980, -11), (2.306, 0.057, -23, 830, 700, 2180, 2420, -13),
              (2.354, 0.075, -21, 765, 970, 3190, 3920, -17),
              (2.456, 0.07, -22, 1080, 1160, 2260, 2420, -9),
              (2.532, .05, -27.5, 805, 770, 3340, 3100, -10),
              (2.613, 0.049, -31.5, 850, 890, 2540, 2890, -4),
              (5.244, .03, -35.5, 930, 1110, 2200, 2260, -11),
              (5.409, .03, -34.5, 890, 1090, 1610, 2050, -7),
              (2.722, 0.067, -37, 840, 910, 3720, 4340, -9.5)]
    # Snorts: t/s, length/s, level/dB, peak/share of length
    snorts = [(3.373, 0.12, -48, 0.63), (3.736, 0.12, -40, 0.57), (3.865, 0.076, -27.5, 0.29)]
    mix = np.zeros(N)
    for s, *settings in growls:
        add(mix, s, growl(*settings))
    for s, length, db, from_hz, to_hz, buzz_db in murmurs:
        add(mix, s, murmur(length, db, from_hz, to_hz))
        add(mix, s, nose_buzz(.88 * length, buzz_db, from_hz, to_hz))
    for s, *settings in snarls:
        add(mix, s, snarl(*settings))
    for s, *settings in snorts:
        add(mix, s, snort(*settings))
    return breathy_and_muffled(mix)


def scene():
    """Everything in the box, with the room ringing after it."""
    voices, whines, knocks, moves, snaps = meerkats(), squeaks(), box_knocks(), paws(), plastic_snaps()
    to_room = gain_of(-9.5) * (voices + snaps.mean(0)) + gain_of(-10) * (moves[0] + knocks)
    to_room += gain_of(-17) * whines  # squeaks are aimed down into the box, so little gets out
    scattered = moves + room_echo(to_room) + hush()
    return microphone_ports(scattered, direct=box_echo(voices + whines + knocks)) + snaps


def record(dry, low_hz=48, high_hz=16000):
    """The microphone drops the deepest bass, clips at full scale and cuts the highest treble."""
    clipped = np.clip(above(dry, low_hz), -1, 1)
    treble_cut = signal.firwin(511, high_hz, window=("kaiser", 9), fs=SR)
    return signal.oaconvolve(clipped, treble_cut[None], "same")


dry = scene()
out = record(dry)
inscribe(out)
```